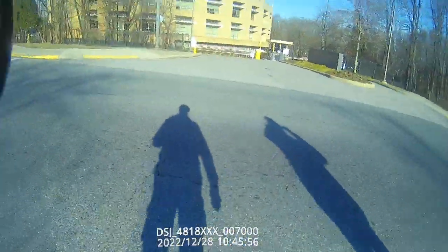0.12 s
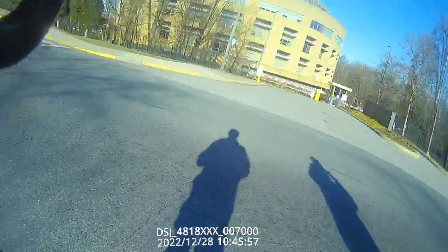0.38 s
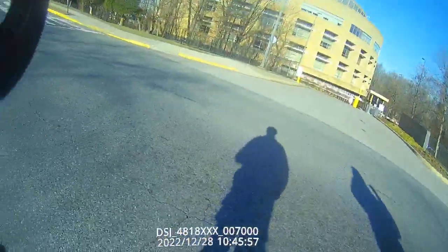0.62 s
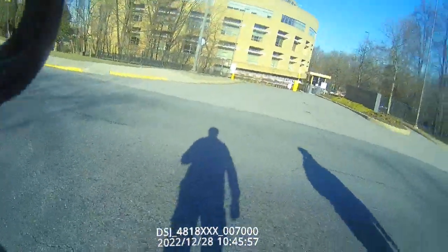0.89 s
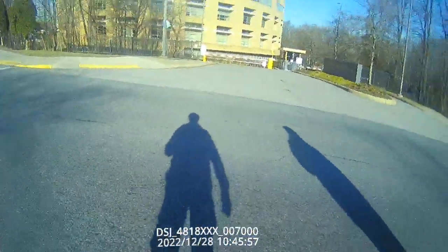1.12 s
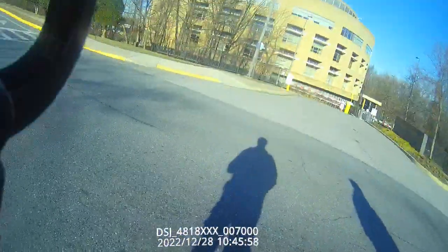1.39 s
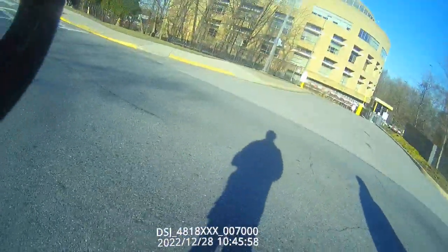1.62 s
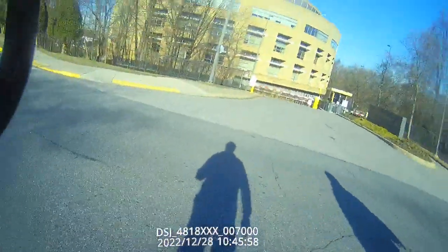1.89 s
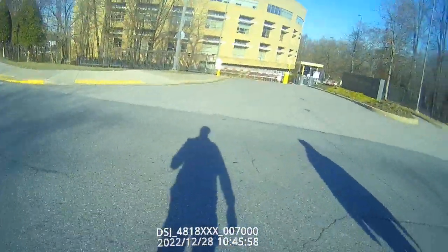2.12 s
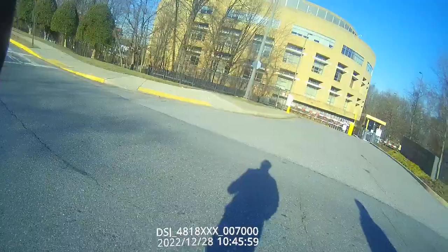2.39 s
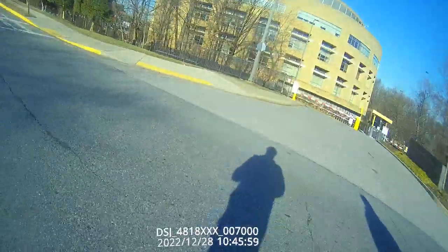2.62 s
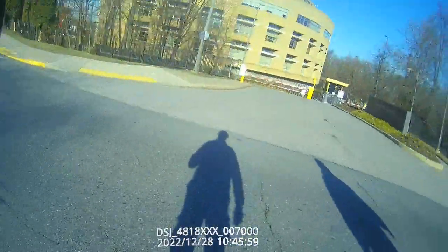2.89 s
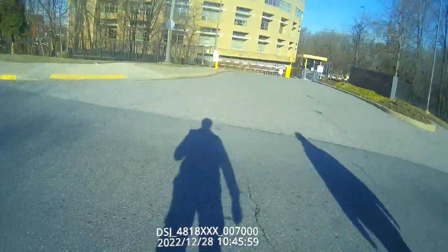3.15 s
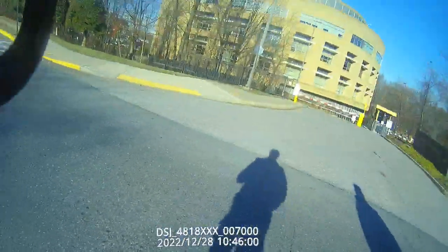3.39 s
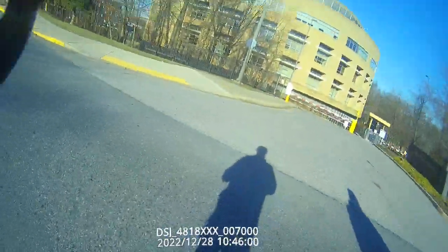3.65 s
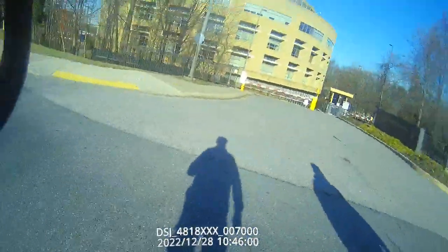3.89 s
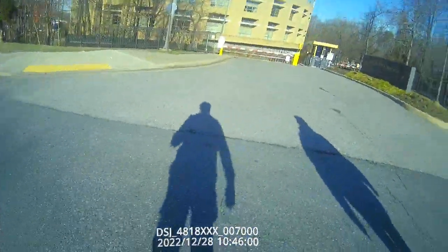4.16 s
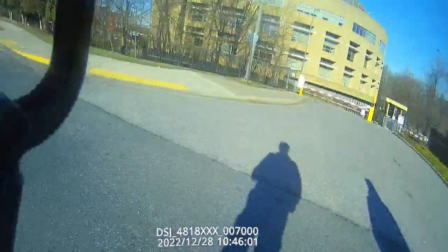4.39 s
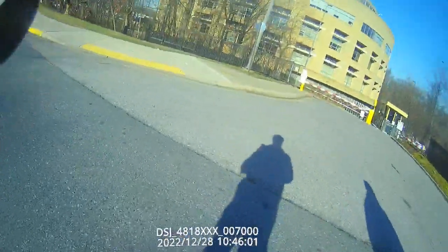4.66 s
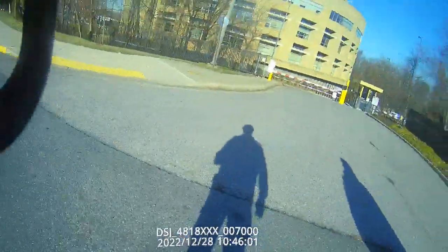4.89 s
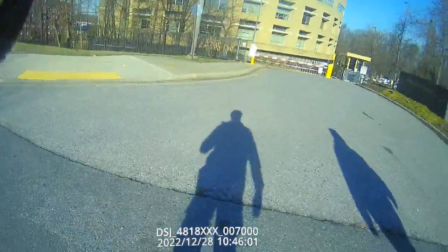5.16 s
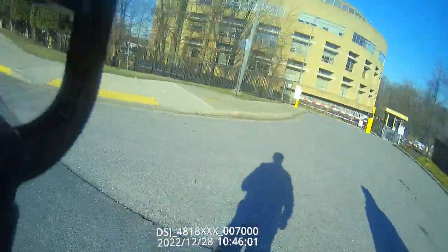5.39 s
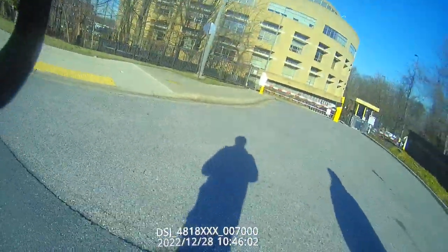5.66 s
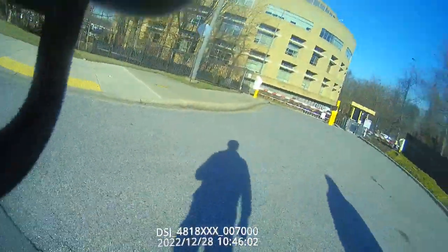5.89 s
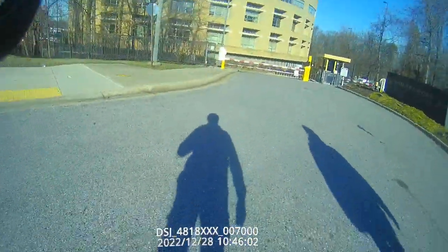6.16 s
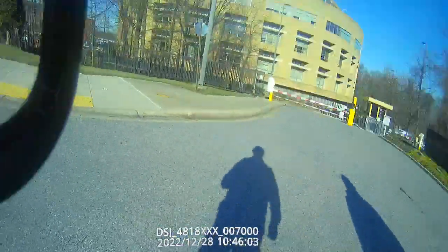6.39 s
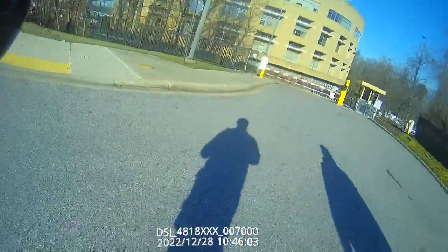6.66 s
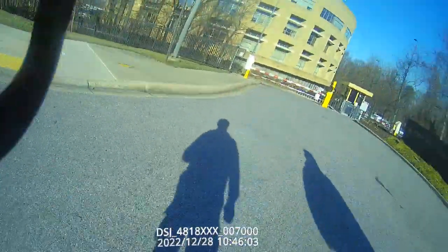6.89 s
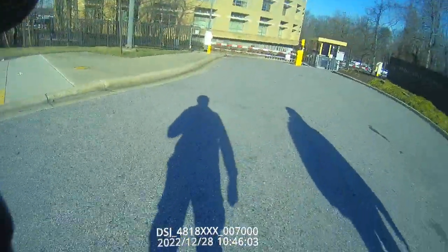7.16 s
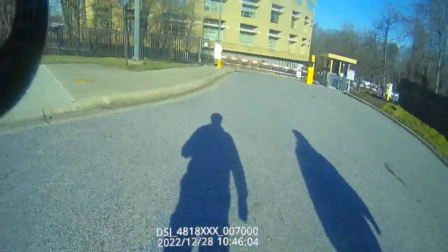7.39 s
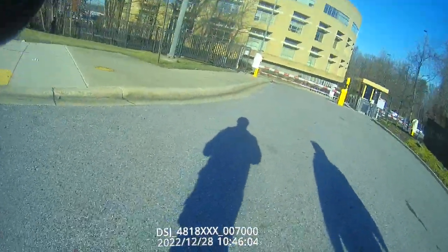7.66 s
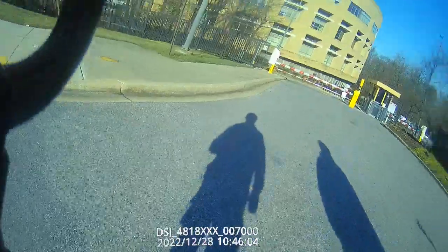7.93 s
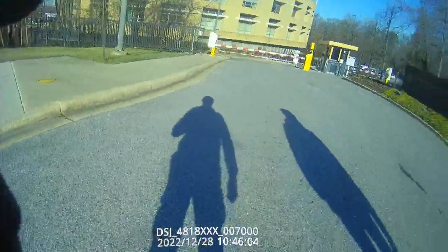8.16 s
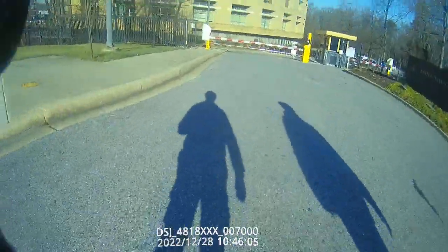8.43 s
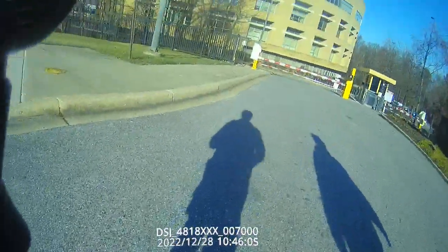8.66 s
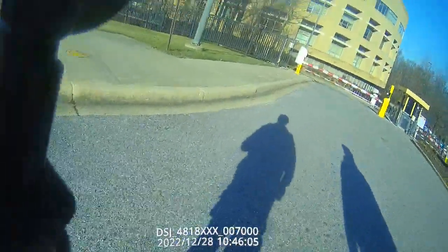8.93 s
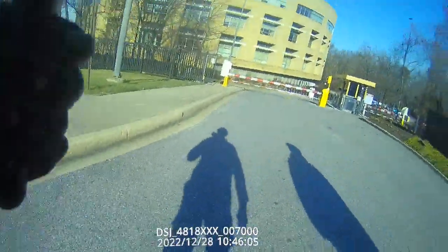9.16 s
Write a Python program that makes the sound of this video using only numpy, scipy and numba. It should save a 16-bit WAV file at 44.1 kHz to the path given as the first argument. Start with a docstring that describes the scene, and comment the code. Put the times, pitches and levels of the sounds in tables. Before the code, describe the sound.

Outdoors on pavement, a walker's body-worn microphone catches irregular wind blows as blunt, low thuds, heaviest early on and sparse later. Dry clicks from a plastic clip and grit, with a few tiny metallic tinkles, are scattered throughout. A soft low hum appears under it, and a vehicle approaches with broad road noise and a wavering engine note, loudest in the final second.

```python
"""An asphalt lot on a windy day, heard from a small camera clipped to a jacket and carried across it.
Eddies of wind thump the microphone as single pressure pulses, crowding together in gusts and rushes.
The heaviest overload it with sudden clicks; a clip ticks and metal parts jingle as struck modes ring,
and cloth and grit brush past as filtered noise. A vehicle draws nearer: tyre roar from banded noise,
engine tones from sine orders, over a hum of two wavering sines."""
import sys
import numpy as np
from scipy import signal
from scipy.fft import rfft, irfft
from scipy.io import wavfile
from scipy.ndimage import uniform_filter1d
from numba import njit

SR = 44100
rng = np.random.default_rng(int(sys.argv[2]) if len(sys.argv) > 2 else 0)


def store_pcm(level_fs):
    """Save levels as 16-bit WAV."""
    pcm = np.round(np.clip(level_fs, -1, 1) * 32767).astype(np.int16)
    wavfile.write(sys.argv[1], SR, np.atleast_2d(pcm).T)


def how_loud(loudness_db):
    """Turn decibels into a plain amplitude multiplier (0 dB gives 1, 20 dB gives 10)."""
    steps = np.asarray(loudness_db, float) / 20
    return 10 ** steps


N = 409688
TIME = np.arange(N) / SR

# road noise, with dips after the heavy thumps: start_s, level_db, tilt_db (per two octaves, about 1 kHz)
ROAD_LEVELS = [(0.0, -48, 6.5), (1.11, -45.5, 3), (1.37, -55, 2), (2.17, -46, 2.5), (2.3, -57, 3),
               (2.66, -53.5, 1.5), (2.89, -49, 0.5), (5.33, -40, 0.3), (7.99, -36.5, 0.7), (8.33, -38, 1.5),
               (9.29, -35, -0.3)]
# tyre roar spectrum before the tilt: frequency_hz, density_db (relative, per Hz)
ROAR_SPECTRUM = [(30, -37), (60, -9), (90, -6.5), (140, -9.5), (200, -8.5), (482, -10), (699, -8),
                 (1010, -13.5), (1350, -15.5), (2200, -28), (3220, -39), (4800, -47), (7000, -58),
                 (8800, -67.5), (10500, -68.5), (16000, -110)]
# engine of the vehicle: start_s, firing_rate_hz, level_db
ENGINE_CURVE = [(4.5, 75.29, -57), (6.4, 74.87, -46), (6.6, 75, -35), (7.15, 77, -39), (7.4, 78, -45),
                (7.95, 78, -36), (8.2, 70.14, -46), (8.45, 67.93, -37), (8.9, 69.14, -29.5),
                (9.05, 73.54, -34.5), (9.29, 76.8, -27)]
# engine orders: multiple (of the firing rate), level_db (relative)
ENGINE_ORDERS = [(1, -7.5), (2, -2.5), (3, -14)]
# swell of the hum: start_s, level_db
HUM_LEVELS = [(0, -55), (3, -51), (4.6, -42), (6.5, -39), (7.7, -38.5), (9.29, -41)]
# tones of the hum: pitch_hz, level_db (relative)
HUM_TONES = [(85, -0.5), (170, -6)]
# cloth brushing past and grit scraping: middle_s, length_s, level_db, centre_hz
BRUSH_EVENTS = [(1.716, 0.0066, -40, 1170), (1.718, 0.0084, -39, 6840), (3.318, 0.098, -67, 4070),
                (4.64, 0.022, -68, 5540), (4.771, 0.013, -52.5, 4130), (4.771, 0.014, -59, 7300),
                (8.54, 0.006, -33.5, 1440), (8.787, 0.013, -54, 7050)]
# jingles of small metal parts: start_s, level_db, upper_modes_db (above 6 kHz), ring_share (of mode t60)
JINGLE_EVENTS = [(0.242, -50, -2, .8), (.358, -55, -27, 1.1), (1.355, -60, -5, .9), (2.507, -68, -8, 0.73),
                 (3.629, -67, 11, 0.56), (4.74, -69, 0, .9), (4.764, -60, 3, .7), (5.712, -66, -12, 3.1),
                 (6.006, -60, -14, 1.9), (7.172, -66, 1, 1.2), (8.166, -51, -6, 0.81)]
# modes of the metal parts: pitch_hz, level_db (relative), t60_s (before the ring share)
METAL_MODES = [(4480, -0.5, 0.087), (4800, -6.5, 0.081), (7500, -4.5, 0.1), (10650, -20.5, .09),
               (11400, -12, 0.065)]
# ticks of the plastic clip and grit under the soles: start_s, high_modes_peak_db, low_mode_share_db
TICK_EVENTS = [(0.201, -48, -3), (0.226, -47, -10), (0.759, -38, 10.5), (0.7856, -44, 6),
               (1.3282, -46.5, -16), (1.7109, -29.5, 2), (1.716, -38, 4), (1.7226, -20.5, -7),
               (2.592, -60.5, 11), (2.7854, -53, 11), (3.6352, -49.5, 18), (3.778, -59, 16),
               (3.8104, -45.5, 10.5), (3.8737, -37.5, -13), (3.937, -43.5, 13), (4.404, -41.5, 3),
               (4.621, -53, 10), (5.914, -43.5, 14), (5.9519, -49, -6.5), (5.9955, -53.5, 19.5),
               (6.928, -39, 10), (6.965, -37.5, -2), (7.036, -48, -4), (7.58, -51, -3), (7.9358, -46, 11.5),
               (8.0063, -47, -4), (8.266, -55, -10), (8.276, -46, -10), (8.493, -49, -6), (8.555, -46, -12),
               (8.59, -54, -12), (8.784, -50, 18.5), (8.984, -41.5, 11.5), (9.053, -44, -5)]
CLIP_RESONANCES = [(1990, 570, -6.5), (3140, 680, 3), (3680, 520, 6.5), (5260, 900, 7), (6530, 540, -3.5)]
# body resonance under the lowest clip mode: pitch_hz, width_hz, level_db (relative)
BODY_RESONANCE = (1550, 200, -4)
# overload clicks in the heaviest thumps: start_s, jump_db, direction (+1 or -1), jump_back_db (re jump)
OVERLOAD_EVENTS = [(1.2379, -7, -1, -49), (1.263, -5, 1, -47), (2.2623, -8, 1, -39),
                   (2.30202, 1.8, 1, -2.5)]
# breeze between the gusts: start_s, level_db
BREEZE_LEVELS = [(0, -34), (.7, -38.5), (1.5, -49), (1.72, -42), (2.0, -38.5), (2.5, -45), (3.5, -48.5),
                 (4.5, -45.5), (5.6, -52), (6.5, -53), (7.6, -44), (8.5, -37.5), (9.2, -39.5),
                 (9.29, -35.5)]
# gusts at the microphone: start_s, end_s, start_level_db, end_level_db, eddy_pitch_shift_db
GUST_EVENTS = [(0.161, 0.34, -15, -29, 0), (0.365, 0.487, -21, -36.5, -3), (0.533, 0.707, -24, -26, -2),
               (0.776, 1, -42.5, -30, -1.5), (1.008, 1.177, -26, -26, -3), (1.212, 1.3, -23, -29.5, -0.5),
               (1.332, 1.47, -28.5, -47.5, 0.5), (2.05, 2.185, -31, -20, -1), (2.244, 2.381, -27, -35, 1.5),
               (2.672, 2.752, -33.5, -44, -3.5), (2.96, 3.224, -44, -34, -2),
               (3.234, 3.358, -22, -28.5, -0.5), (3.573, 3.827, -28.5, -25.5, -0.5),
               (4.028, 4.12, -33.5, -25, -2), (4.206, 4.371, -33, -33, -1), (4.392, 4.451, -20.5, -29.5, 3),
               (4.965, 5.182, -30.5, -36, 0), (5.208, 5.573, -30.5, -40.5, -1.5),
               (5.746, 5.974, -34, -45.5, 1), (6.149, 6.173, -22.5, -26.5, 0),
               (6.296, 6.308, -12.5, -29.5, 0), (6.361, 6.494, -20.5, -32.5, -1),
               (6.687, 6.893, -38.5, -35.5, -1), (7.311, 7.387, -30, -36, -3.5),
               (7.378, 7.528, -20, -22.5, -3)]
# dense rushes of small eddies: start_s, end_s, starting_level_db, starting_pitch_hz
RUSH_EVENTS = [(1.21, 1.298, -17, 298), (1.221, 1.331, -17.5, 860), (2.261, 2.326, -24, 754),
               (2.302, 2.42, -30, 375), (4.383, 4.469, -28, 560)]
# the strongest single eddies: start_s (of the pulse centre), level_db, pitch_hz
THUMP_EVENTS = [(0.153, -17, 265), (0.161, -14, 251), (0.184, -11, 220), (0.2186, -9.5, 200),
                (0.315, -12.5, 197), (0.3724, -15.5, 313), (0.378, -7.5, 260), (0.5533, -9.5, 267),
                (0.6235, -16, 168), (0.648, -6, 358), (0.679, -14, 335), (0.6916, -10, 174),
                (0.8845, -17, 211), (1.0224, -13.5, 181), (1.1045, -7.5, 187), (1.149, -10.5, 207),
                (1.1956, -10.5, 80.0), (1.2188, -4, 274), (1.224, -4.5, 248), (1.2333, 2.5, 245),
                (1.2354, -2.5, 474), (1.2413, 0, 341), (1.2569, 0, 570), (1.2622, -6.5, 420),
                (1.27, 0, 663), (1.443, -18.5, 226), (2.031, -13, 227), (2.1182, -11, 138),
                (2.151, -11.5, 168), (2.1849, -5, 253), (2.262, -2.5, 280), (2.274, -18, 300),
                (2.2801, -5, 270), (2.292, -8.5, 110.6), (2.3021, -3, 330), (2.3355, -9, 240),
                (2.373, -18.5, 330), (2.393, -23.5, 330), (2.446, -25.5, 280), (2.6872, -18, 175),
                (3.261, -12, 306), (3.2885, -8, 182), (3.307, -7.5, 92), (3.342, -9.5, 131),
                (3.6405, -11.5, 255), (3.6767, -12, 331), (3.7535, -10.5, 128.6), (3.7833, -12, 231),
                (3.849, -14, 270.0), (3.9973, -17.5, 247), (4.113, -14, 370), (4.3856, -9, 260),
                (4.391, -12, 297), (4.41, -15.5, 260), (4.4284, -18, 313), (4.9672, -10.5, 252),
                (5.065, -15.5, 329), (5.2068, -8.5, 349), (5.3911, -15, 161), (5.7774, -16, 150.0),
                (6.158, -15.5, 203), (6.2942, -12.5, 253), (6.3784, -12.5, 361), (6.402, -13, 150.0),
                (6.4333, -9, 190), (6.4756, -8.5, 221), (7.3984, -9.5, 190), (7.429, -15, 110),
                (7.4553, -12, 218), (7.4803, -9, 213), (7.519, -13, 150.0), (7.839, -18, 600),
                (8.362, -22.5, 119), (8.509, -20.5, 150.0)]


def curve(table):
    """Joins the columns of a table by straight lines in time."""
    s, *columns = np.transpose(table)
    return [np.interp(TIME, s, column) for column in columns]


def unit(x):
    """Scales a signal to rms 1."""
    return x / np.sqrt(np.mean(x ** 2))


def band(x, hz, width):
    """Two-pole resonance with gain 1 at its centre."""
    return signal.lfilter(*signal.iirpeak(hz, hz / width, fs=SR), x)


def walk(rate):
    """Random levels held for 1 / rate seconds and smoothed twice; spread near 1."""
    hold = int(SR / rate)
    steps = np.repeat(rng.standard_normal(N // hold + 1), hold)
    return 1.29 * uniform_filter1d(uniform_filter1d(steps, hold), hold)[:N]


def road():
    """Tyre roar: noise in half-octave bands that swell together and flicker alone."""
    level_db, tilt_db = curve(ROAD_LEVELS)
    hz, density_db = np.transpose(ROAR_SPECTRUM)
    f = np.fft.rfftfreq(N, 1 / SR) + 1
    noise = rfft(rng.standard_normal(N)) * how_loud(np.interp(np.log(f), np.log(hz), density_db))
    roar, swell = 0, walk(5.5)
    for k in range(-9, 9):  # half octaves from 1 kHz
        share = np.clip(1 - np.abs(2 * np.log2(f / 1000) - k), 0, 1)
        flicker = (1.43 + 0.023 * k) * walk(9.7)
        roar = roar + irfft(noise * share, N) * how_loud(tilt_db * k / 4 + 0.14 * swell + flicker)
    return unit(roar) * how_loud(level_db)


def engine():
    """Sine orders of a drifting firing rate, each wavering in level."""
    hz, level_db = curve(ENGINE_CURVE)
    phase = 2 * np.pi * np.cumsum(hz * (1 + 0.0062 * walk(12))) / SR
    tones = sum(how_loud(db + 2.0 * walk(5.6)) * np.sin(k * phase) for k, db in ENGINE_ORDERS)
    return tones * how_loud(level_db) * (TIME > ENGINE_CURVE[0][0])


def hum():
    """Two sines of fixed pitch that waver slowly in level."""
    tones = sum(how_loud(db + 0.59 * walk(0.99)) * np.sin(2 * np.pi * hz * TIME) for hz, db in HUM_TONES)
    return tones * how_loud(curve(HUM_LEVELS)[0])


def crackle():
    """Faint stray ticks of stiff fabric: random puffs of noise, growing louder as the walk goes on."""
    per_second = 8
    sparks = (rng.random(N) < per_second / SR) * how_loud(2.5 * rng.standard_normal(N))
    puffs = signal.lfilter([1], [1, -0.985], sparks) * rng.standard_normal(N)
    return how_loud(-63.5 + 1.1 * TIME) * band(puffs, 6500, 5000)


def brushes():
    """Swishes and scrapes: each a swell of grainy noise in one broad resonance."""
    grain = rng.standard_normal(N) * how_loud(2.7 * walk(150))
    out = 0
    for middle, length, db, hz in BRUSH_EVENTS:
        swell = np.exp(-((TIME - middle) / length * 2) ** 2)
        burst = swell * band(band(grain, hz, hz / 3), hz, hz / 3)
        level_match = np.sqrt(np.sum(swell ** 2) / np.sum(burst ** 2))
        out = out + how_loud(db) * burst * level_match
    return out


def jingles():
    """Each touch rings the same metal modes in another mix; the parts rattle, so the ring is uneven."""
    length = 8192
    out, t = np.zeros(N + length), np.arange(length) / SR
    for s, db, upper_db, ring in JINGLE_EVENTS:
        chance = rng.standard_normal((len(METAL_MODES), 2))
        for (hz, mode_db, t60), (mix, detune) in zip(METAL_MODES, chance):
            fade = np.exp(-np.log(1000) * t / (ring * t60)) * np.minimum(t / 0.0053, 1)
            level_db = db + mode_db + upper_db * (hz > 6000) + 1.5 * np.tanh(mix)
            tone = np.sin(2 * np.pi * hz * (1 + 0.005 * detune) * t)
            out[int(s * SR):][:length] += how_loud(level_db) * fade * tone
    return out[:N] * how_loud(4.5 * walk(260))


def ticks():
    """A few milliseconds of rough contact ring the short clip modes, a little differently each time."""
    length = 1024
    out, t = np.zeros(N + length), np.arange(length) / SR
    body_hz, body_width, body_db = BODY_RESONANCE
    for s, db, low_db in TICK_EVENTS:
        contact = rng.standard_normal(length) * np.exp(-t / 0.0014) * np.minimum(t / 0.001, 1)
        chance = rng.standard_normal((len(CLIP_RESONANCES), 2))
        rings = []
        for (hz, width, mode_db), (mix, detune) in zip(CLIP_RESONANCES, chance):
            excited = band(contact, hz, 2 * width)
            ring = band(excited, hz * (1 + 0.014 * detune), width)
            rings.append(how_loud(mode_db + 2.0 * np.tanh(mix)) * ring)
        high = sum(rings[1:])
        low = rings[0] + how_loud(body_db) * band(contact, body_hz, body_width)  # woody body of the tick
        tick = high / np.abs(high).max() + how_loud(low_db) * low / np.abs(low).max()
        out[int(s * SR):][:length] += how_loud(db) * tick
    return out[:N]


def through_case(x):
    """Sound carried through the case loses its top."""
    return signal.sosfilt(signal.butter(5, 7250, fs=SR, output="sos"), x)


def overload_clicks():
    """Heavy thumps overload the microphone: each click jumps at once and drains; one clearly jumps back."""
    hold_s, settle_s, top_hz = 0.00044, 0.0012, 3680  # time to the jump back, drain time, low-pass
    jumps = np.zeros(N)
    for s, db, way, back_db in OVERLOAD_EVENTS:
        start = int(s * SR)
        jumps[start] += np.sign(way) * how_loud(db)
        jumps[start + int(hold_s * SR)] -= np.sign(way) * how_loud(db + back_db)
    drained = signal.lfilter([1], [1, -np.exp(-1 / (settle_s * SR))], jumps)
    return signal.sosfilt(signal.butter(2, top_hz, fs=SR, output="sos"), drained)


def gusts():
    """Wind level and pitch shift: the breeze, or a gust that blows over it with quick edges."""
    attack_s, release_s = 0.014, 0.021  # time for 20 dB
    level, shift = curve(BREEZE_LEVELS)[0], np.zeros(N)
    for start, end, start_db, end_db, shift_db in GUST_EVENTS:
        edges = np.maximum(start - TIME, 0) / attack_s + np.maximum(TIME - end, 0) / release_s
        gust = np.interp(TIME, [start, end], [start_db, end_db]) - 20 * edges
        shift = np.where(gust > level, shift_db, shift)
        level = np.maximum(level, gust)
    return level, shift


@njit
def eddies(at, size, hz, drag, n):
    """Each eddy is one pressure pulse between two opposite rebounds; the second rebound is slower."""
    out = np.zeros(n)
    for e in range(len(at)):
        step = np.pi * hz[e] / SR
        first = max(int(at[e] - 3 / step), 0)
        last = min(int(at[e] + 3 / step / drag), n)
        for i in range(first, last):
            u = ((i - at[e]) * step * (drag if i > at[e] else 1.)) ** 2
            out[i] += size[e] * (1 - 2 * u) * np.exp(-u)
    return out


DRAG = 0.8  # speed of the second half of an eddy against the first


def gust_eddies(level, shift, count=2800):
    """Random eddies of uneven size follow the wind level; stronger wind raises their pitch."""
    place, (spread, luck, side) = rng.random(count), rng.standard_normal((3, count))
    at = place * (N - 1)
    here_db, here_shift = level[at.astype(int)], shift[at.astype(int)]
    # 150 Hz is typical at -35 dB of wind; pitch rises 0.15 dB per dB
    hz = 150 * how_loud(0.15 * (here_db + 35) + here_shift + 4.56 * np.minimum(spread, 1.6))
    peak = np.sign(side) * (hz / 200) ** 0.16 * how_loud(here_db + 5.64 * np.minimum(luck, 1.9))
    return eddies(at, peak, np.clip(hz, 30, 800), DRAG, N)


def rushes(count=220):
    """Dense small eddies at the height of a gust; each rush dies away and grows duller."""
    out = np.zeros(N)
    for start, end, db, pitch in RUSH_EVENTS:
        place, (spread, luck) = rng.random(count), rng.standard_normal((2, count))
        peak = luck * how_loud(db - 24 * place ** 1.6 - 3.3 * spread)  # the smallest eddies are the weakest
        hz = pitch * how_loud(2.67 * np.minimum(spread, 1.4) - 10.0 * place ** 2)
        out += eddies((start + (end - start) * place) * SR, peak, hz, DRAG, N)
    return out


def thumps():
    """The strongest eddies are pressure dips, each sharpened by a narrow core."""
    s, db, pitch = np.transpose(THUMP_EVENTS)
    dip = eddies(s * SR, 0.79 * how_loud(db), pitch, DRAG, N)
    core = eddies(s * SR, 0.16 * how_loud(db), 2.4 * pitch, DRAG, N)
    return -(dip + core)


def pressure_swings(level):
    """Slow noise swings follow the gusts loosely and die down as the walk goes on."""
    low_band = signal.butter(2, [18, 52], "band", fs=SR, output="sos")
    slow = signal.sosfilt(low_band, rng.standard_normal(N))
    loose_level = uniform_filter1d(level, int(0.08 * SR))
    return unit(slow) * how_loud(0.65 * loose_level - 14.0 - 2.7 * TIME)


def wind():
    """Wind on the microphone: random eddies, rushes, single thumps and slow pressure swings."""
    level, shift = gusts()
    return gust_eddies(level, shift) + rushes() + thumps() + pressure_swings(level)


def scene():
    """Everything that is heard at the microphone, with its overload clicks."""
    background = road() + engine() + hum()
    handling = through_case(crackle() + brushes() + ticks()) + jingles()
    return (background + handling + overload_clicks() + wind())[None]


def low_pass(x):
    """Removes everything above the highest recorded frequency."""
    return signal.sosfilt(signal.butter(12, 15270, fs=SR, output="sos"), x)


def record(dry):
    """The small microphone rounds the loudest peaks."""
    rounded = np.tanh(1.08 * dry) / 1.08
    return low_pass(rounded)


dry = scene()
out = record(dry)
store_pcm(out)
```